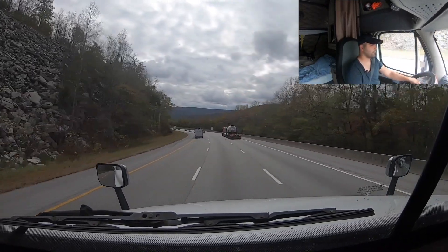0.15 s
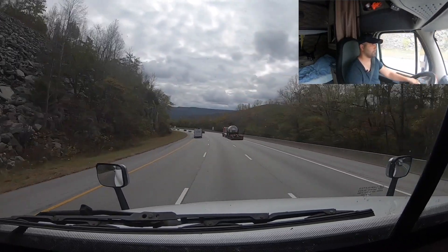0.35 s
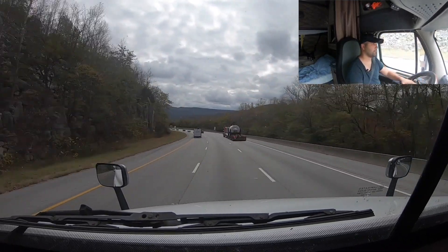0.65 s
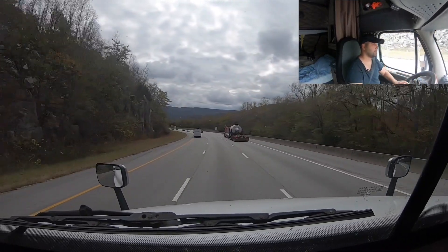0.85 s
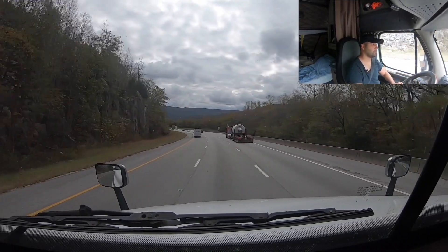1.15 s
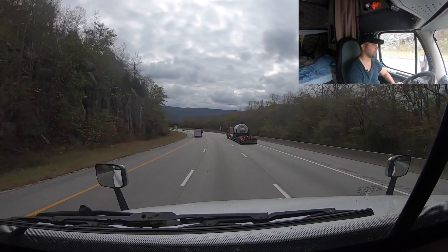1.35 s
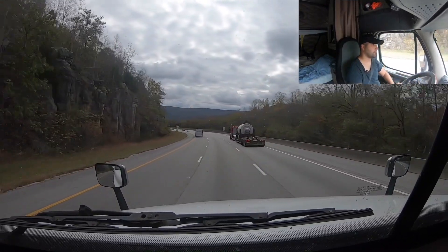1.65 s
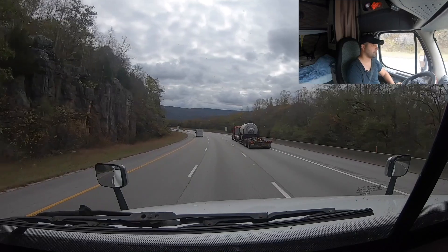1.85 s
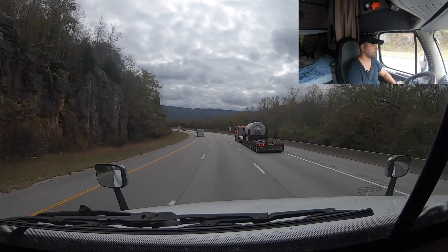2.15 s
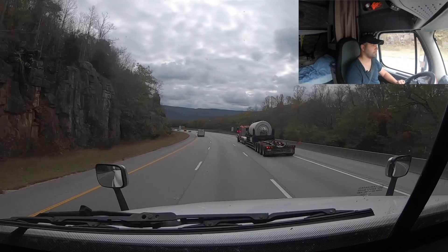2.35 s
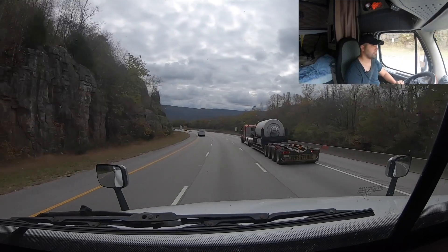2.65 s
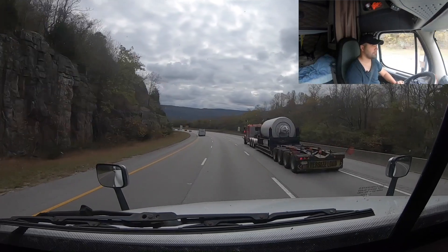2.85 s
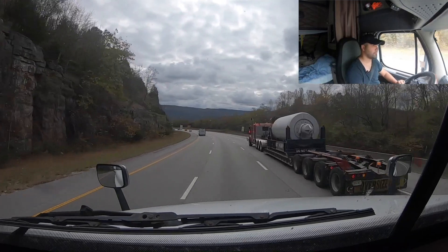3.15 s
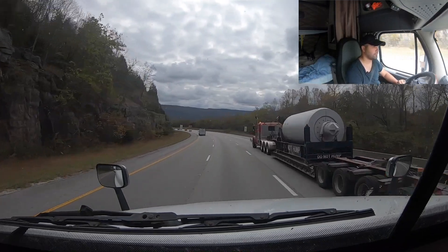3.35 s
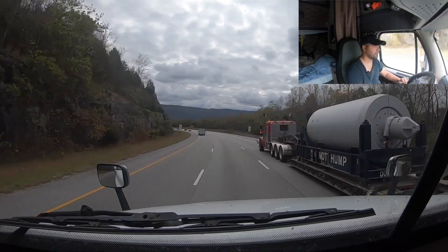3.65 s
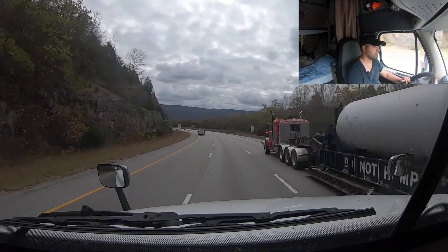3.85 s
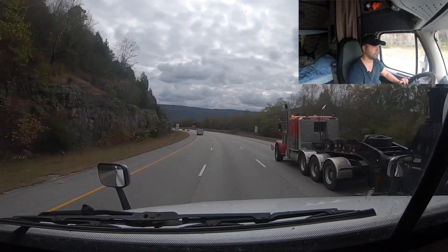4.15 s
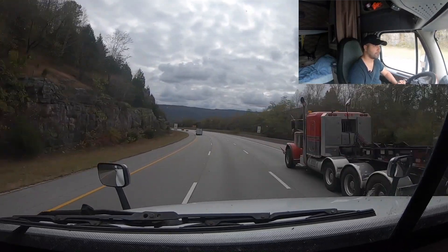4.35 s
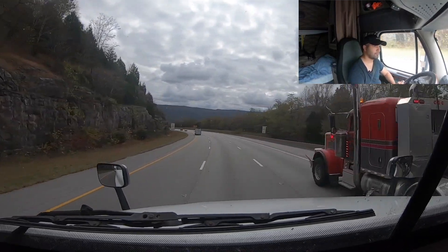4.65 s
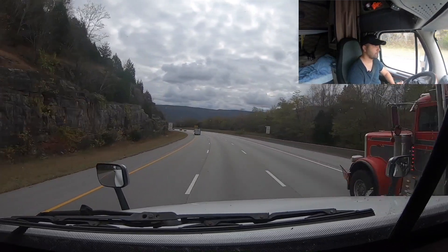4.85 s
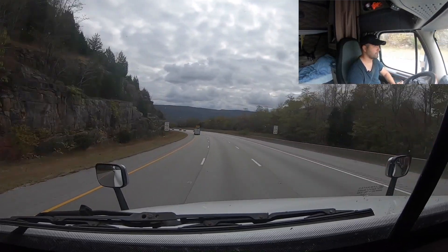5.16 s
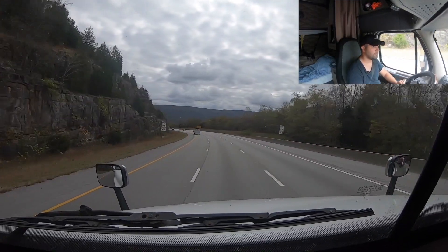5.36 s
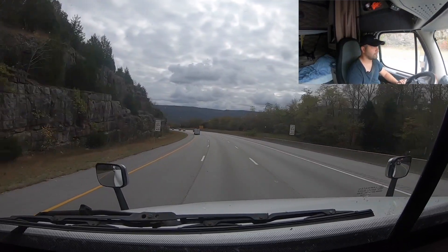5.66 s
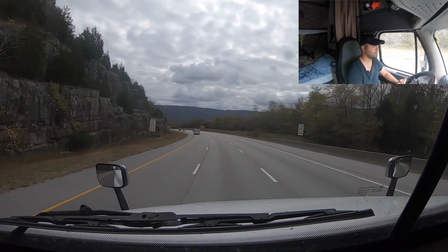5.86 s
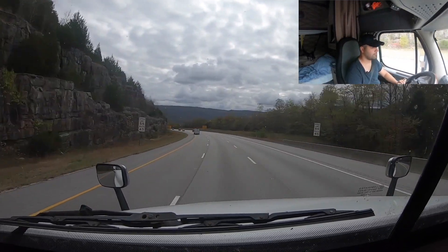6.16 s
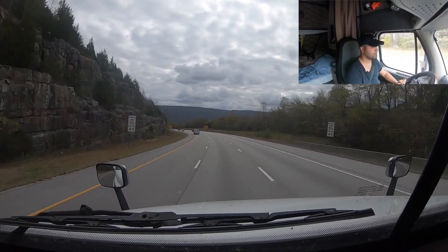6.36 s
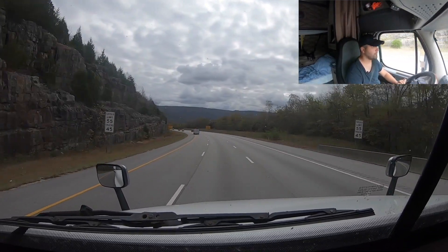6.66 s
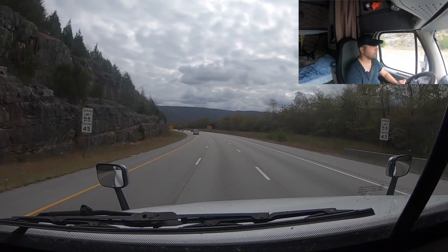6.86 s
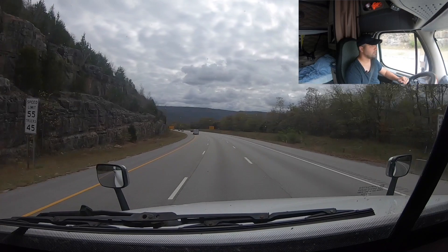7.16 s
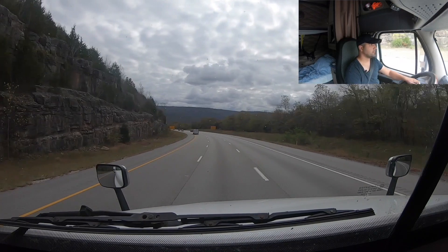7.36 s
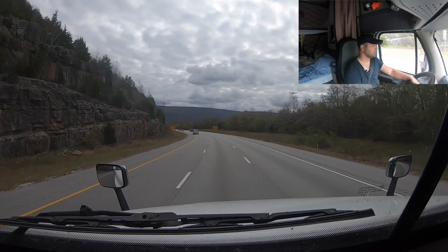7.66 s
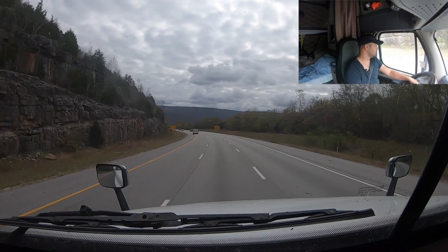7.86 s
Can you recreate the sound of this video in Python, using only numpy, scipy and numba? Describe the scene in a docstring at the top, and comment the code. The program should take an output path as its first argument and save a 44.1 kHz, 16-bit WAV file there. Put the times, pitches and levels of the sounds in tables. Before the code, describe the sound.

Inside the cab of a semi truck, heard from the dashboard, a diesel engine drones at a nearly constant pitch over a deep rumble of tyres and wind. From the start the engine brake adds valve clatter, hiss and a faint high turbo whistle, while loose trim buzzes and ticks lightly close by. The brake lets go at about 2 seconds and bites again at 3. From about 3.5 seconds a heavy hauler is overtaken: its tyres roar softly, then its exhaust throbs and growls against the truck's own engine, strongest around 5 seconds. At 5.5 seconds the brake comes off, the hiss and whistle die away, and a louder low exhaust boom fills the cab, easing near 7.7 seconds. A faint thin whine enters around 6.7 seconds. At the very end, near 8 seconds, a faint hiss rises as the brake starts to bite again.

```python
"""Inside the cab of a semi truck going down a grade, one microphone at the dashboard. From the start the
six-cylinder diesel drones near 1550 rpm under its engine brake, with valve clatter, hiss and a turbo
whistle; tyres and wind rumble and loose trim chatters close by. The brake lets go at 2.1 s and bites again
at 3 s. About five seconds in, a heavy hauler is overtaken. At 5.5 s the brake comes off and the exhaust
booms in the cab; a thin whine follows. At the very end a faint hiss rises as the brake starts to bite."""
import sys
import numpy as np
from scipy import signal
from scipy.fft import rfft, irfft, next_fast_len
from scipy.io import wavfile
from numba import njit

SR = 44100
rng = np.random.default_rng(int(sys.argv[2]) if len(sys.argv) > 2 else 0)


def generate_wav(signal):
    """Clip the signal to [-1, 1] and save it as 16-bit WAV at the path in sys.argv[1]."""
    frames = np.transpose(np.atleast_2d(signal))
    scaled = np.clip(frames, -1, 1) * 32767
    pcm = np.round(scaled).astype(np.int16)
    wavfile.write(sys.argv[1], SR, pcm)


N = 353241
CYLINDERS = 6
# engine speed (time [s], firing rate [Hz])
FIRING_RATE = [(0, 76.2), (1.5, 75.9), (3, 77), (5.35, 77), (6, 77.7), (6.5, 78.45), (7, 78.8), (8, 79.75)]


def undb(db):
    """Decibels to gain."""
    return 10 ** (np.asarray(db) / 20)


def level(x, db):
    """The sound at a given rms level."""
    return x * undb(db) / np.sqrt(np.mean(x ** 2))


def curve(table):
    """A table of (time, value), sample by sample."""
    times, values = np.transpose(table)
    return np.interp(np.arange(N) / SR, times, values)


def ramp(at_s, length_s):
    """A rise from 0 to 1 centred on a moment."""
    return np.clip(.5 + (np.arange(N) / SR - at_s) / length_s, 0, 1)


def passing(peak_s, half_s, db):
    """A gain that swells, peaks and fades, as when something slides past the microphone."""
    return undb(db) / (1 + ((np.arange(N) / SR - peak_s) / half_s) ** 2)


@njit
def lag(target, rise_s, fall_s):
    """Follow a target with inertia, at one pace up and another down."""
    out, now = np.empty(len(target)), target[0]
    for i in range(len(target)):
        now += (target[i] - now) / (SR * (rise_s if target[i] > now else fall_s))
        out[i] = now
    return out


def walk(rate):
    """A random wander with rate steps a second; rms 1."""
    steps = rng.standard_normal(4096)
    return level(np.interp(np.arange(N) / SR * rate, np.arange(len(steps)), steps), 0)


def turns(hz):
    """Cycles counted so far at a moving rate."""
    return np.cumsum(hz) / SR


def tone(cycles):
    """A sine of rms 1 that starts anywhere in its cycle."""
    return np.sqrt(2) * np.sin(2 * np.pi * (cycles + rng.random()))


def pulse(cycles):
    """A sine of rms 1 with its trough on each whole cycle."""
    return -np.sqrt(2) * np.cos(2 * np.pi * cycles)


def noise():
    """White noise of rms 1."""
    return rng.standard_normal(N)


def colour(x, points):
    """Filter by a spectrum of (frequency [Hz], level [dB]) points; rms 1."""
    size = next_fast_len(N)
    hz, db = np.transpose(points)
    bin_hz = np.maximum(np.arange(size // 2 + 1) * SR / size, 1)
    gain = undb(np.interp(np.log(bin_hz), np.log(hz), db))
    return level(irfft(rfft(x, size) * gain, size)[:N], 0)


def resonance(hz, width_hz):
    """Noise ringing in a steep resonance; rms 1."""
    b, a = signal.iirpeak(hz, hz / (1.5 * width_hz), fs=SR)
    return level(signal.lfilter(b, a, signal.lfilter(b, a, noise())), 0)


def cab(x, t60_s, wet):
    """Glass and panels near the microphone throw back early echoes, which comb the sound; rms 1."""
    t = np.arange(SR // 8) / SR
    echoes = rng.standard_normal(len(t)) * undb(-60 * t / t60_s)
    response = wet * echoes / np.linalg.norm(echoes)
    response[0] += 1
    return level(signal.fftconvolve(x, response)[:N], 0)


def drone(cycle, brake):
    """Engine and driveshaft lines; the low ones join in one thump a cycle; the brake shifts their mix."""
    # whole multiples come from the cylinders, the others from the driveshaft
    # (multiple of the cycle rate, level braking [dB], level rolling free [dB])
    lines = [(2, -32, -31), (2.83, -25.5, -29.5), (3, -39, -46), (4, -35, -32.5), (7, -42, -38),
             (8, -41, -45), (8.48, -34.5, -38.5), (9, -39, -30.5), (10, -35, -40), (13, -52, -52),
             (15, -55, -47), (17, -52, -52), (18, -42.5, -48.5), (19.77, -49, -54), (20, -52, -57),
             (22.6, -49, -51), (24, -54, -50), (26, -52, -50), (27, -49.5, -48), (28.25, -51, -51),
             (29, -52, -64), (30, -60, -50), (32, -52, -59), (34, -55, -57), (36, -55, -53), (38, -50, -53),
             (39, -55, -68), (40, -55, -61), (44, -58, -59), (45, -56, -60), (46, -57, -68), (54, -62, -57),
             (56, -56, -56), (57, -52.5, -53), (60, -57, -59), (63, -62, -57), (64, -57, -60),
             (66, -56, -58), (68, -58, -64), (69, -54, -55.5), (70, -54.5, -63), (71, -58, -68),
             (72, -54, -61), (75, -58, -70), (79, -62, -68), (84, -59, -70), (144, -68, -72),
             (165, -70, -85)]
    # stiff panels that sing when a line meets their pitch (frequency [Hz], width [Hz], lift [dB])
    stiff_panels = [(120, 4, 4.5), (359, 7, 7), (886, 9, 4.5)]
    tilt_db_per_octave = -0.02 - 0.04 * brake
    cycle_hz = curve(FIRING_RATE) / CYLINDERS
    out = 0
    for multiple, braking_db, free_db in lines:
        db = free_db + brake * (braking_db - free_db) + walk(4)
        singing_db = sum(lift_db / (1 + ((multiple * cycle_hz - hz) / (width / 2)) ** 2)
                         for hz, width, lift_db in stiff_panels)
        gain = undb(db + singing_db + tilt_db_per_octave * np.log2(multiple))
        stray = (rng.random() - .5) * min(multiple / 16, 1)  # higher lines fall out of step
        out = out + gain * pulse(multiple * cycle + stray)
    return out


def exhaust_boom(cycle, crank_wobble=.03):
    """The firing pulses, smoothed by the muffler to two harmonics, swell in the cab."""
    # boom at the firing rate (time [s], level [dB])
    firing_levels = [(0, -36), (.6, -28), (1.1, -53), (2.2, -37), (2.6, -28.5), (3.15, -31.5), (3.9, -26.5),
                     (4.9, -23.5), (5.38, -29.5), (5.53, -13), (5.68, -18.5), (6.3, -14), (7, -19),
                     (7.12, -24), (7.27, -17.5), (7.58, -19.5), (7.78, -26.5), (8.01, -31)]
    # its second harmonic (time [s], level [dB])
    overtone_levels = [(0, -51), (1, -40.5), (2, -33), (2.7, -36.5), (3.1, -34), (3.6, -40), (4.1, -37),
                       (6.2, -38), (6.5, -30.5), (7.2, -35), (7.5, -48)]
    beats = CYLINDERS * cycle + crank_wobble * np.sin(2 * np.pi * cycle)  # the crank hurries and lags
    firing = undb(curve(firing_levels) + 0.37 * walk(6.8)) * pulse(beats)
    overtone = undb(curve(overtone_levels) + walk(3.12)) * pulse(2 * beats)
    return firing + overtone


def engine_brake(cycle, brake, clatter_db=-48, hiss_db=-45.5, puff_depth=0.32, idle_share=0.66):
    """Each cylinder dumps its compressed air: a knock that repeats every cycle, and a puff of hiss."""
    # valve clatter heard through the firewall (frequency [Hz], level [dB])
    clatter_spectrum = [(100, -24), (400, 3), (650, -7), (800, 6), (1060, -1.5), (1300, -2), (2200, -15.5),
                        (4000, -19), (8000, -33)]
    # the brake's hiss heard in the cab (frequency [Hz], level [dB])
    hiss_spectrum = [(300, 1), (600, -15), (880, 8), (1300, -8), (1900, -8.5), (3400, -19), (4500, -47),
                     (5500, -23.5), (6500, -16), (7600, -22), (11000, -22.5), (13600, -30), (14300, -26),
                     (14850, -17), (15400, -27)]
    puff = 1 - puff_depth + puff_depth * np.exp(-(CYLINDERS * cycle % 1) / 0.4)
    pattern = rng.standard_normal(4096)  # every cylinder and valve knocks in its own way
    knocks = np.interp(cycle % 1, np.linspace(0, 1, len(pattern)), pattern) * puff
    valve_force = idle_share + (1 - idle_share) * brake  # the valves tick on without the brake
    clatter = colour(knocks, clatter_spectrum) * valve_force
    air = cab(noise() * puff, t60_s=0.086, wet=1.0)
    hiss = colour(air + 0.25 * knocks, hiss_spectrum)
    pressure = lag(brake, rise_s=0.017, fall_s=.14)  # the air bleeds away after the brake lets go
    return undb(clatter_db) * clatter + pressure * undb(hiss_db) * hiss


def gears(cycle, brake, teeth=83, whine_db=-49.5):
    """The timing gears whine as the brake's load builds; a second whine flares briefly just below."""
    load = lag(brake, rise_s=0.66, fall_s=.02)
    whine = load * undb(whine_db + .7 * walk(2.56)) * tone(teeth * cycle)
    flare = passing(peak_s=4.07, half_s=0.13, db=-47.5) * tone(79.3 * cycle)
    return brake * (whine + flare)


def turbo(brake, free_hz=8130, braking_hz=10235, slow_db=-73.5, full_db=-67, flutter=0.00198):
    """Compressor blades whistle in turbulent air, spinning up under the brake, running down after it."""
    spin = lag(brake, rise_s=1.0, fall_s=.29)
    hz = free_hz + spin * (braking_hz - free_hz)
    blades = tone(turns(hz * (1 + flutter * walk(70))))
    db = slow_db + brake * np.sqrt(spin) * (full_db - slow_db) + walk(16)
    whistle = level(blades * (1 + walk(260)), 0)
    fade = np.minimum(spin / .05, 1)  # the whistle dies as the boost runs out
    return fade * undb(db) * whistle


def panel_hum(cycle, multiple=22):
    """A cab panel hums along with one multiple of the engine's cycle rate."""
    # the panel's hum (time [s], level [dB])
    hum_levels = [(0, -33), (.9, -32.5), (1.7, -34), (2.0, -40), (2.3, -44), (2.5, -36.5), (2.9, -39),
                  (3.4, -32), (3.75, -35), (4.1, -32), (4.7, -33), (5.05, -38), (5.35, -36), (5.8, -46),
                  (6.2, -40), (8.01, -39)]
    return undb(curve(hum_levels) + walk(7.1)) * tone(multiple * cycle)


def road(rush_db=-27, rumble_top_hz=62.5):
    """Tyres and wind through the shell of the cab, its hollows ringing; the rumble follows the bumps."""
    # gusts of wind on the cab (time [s], gain [dB])
    wind = [(0, -1), (2.5, -1.5), (3.6, -2), (4.9, -0.5), (5.7, 0), (6.4, -0.5), (7.2, 0.5), (8.01, -1)]
    # rush of wind and road heard inside (frequency [Hz], level [dB])
    rush_spectrum = [(8, -14), (50, -6.5), (70, -5.5), (130, -8), (220, -19.5), (430, -25.5), (640, -25.5),
                     (820, -26), (1100, -33.5), (2000, -44), (3500, -50.5), (4400, -59.5), (6000, -54.5),
                     (11000, -64), (15500, -66)]
    # roar of the tyres on the changing surface (time [s], level [dB])
    surface = [(0, -38.5), (1, -44), (1.8, -43), (2.3, -37), (3, -41), (3.6, -37), (5.4, -41.5), (5.9, -39),
               (7.2, -42), (8.01, -38)]
    # colour of that roar (frequency [Hz], level [dB])
    roar_spectrum = [(100, -27), (200, 1), (330, 4), (480, -5), (600, -1), (760, -21), (950, -14),
                     (1300, -12), (2000, -35), (4000, -45), (8000, -62)]
    # hollows of the cab that the road excites (frequency [Hz], width [Hz], level [dB])
    cab_modes = [(14.05, 8.9, -23.5), (25.5, 4.8, -34.5), (40, 9, -34), (49, 11.6, -36.5),
                 (279.2, 25, -44.5), (338, 30, -45.5), (420.3, 13.4, -51.5), (495.5, 40, -50.5),
                 (742, 27, -51.5)]
    # deep rumble over the uneven road (time [s], gain [dB])
    bumps = [(0, 5), (1.55, -5), (1.8, -19), (2.05, 6), (2.7, -11.5), (3.2, -3), (3.5, 2), (4.2, 2),
             (4.65, 0), (5.15, 1.5), (5.7, 0), (6.25, -8), (7, 0.5), (7.7, 3.5), (8.01, 2)]
    rush = undb(rush_db + curve(wind) + 0.5 * walk(4)) * colour(noise(), rush_spectrum)
    roar = undb(curve(surface)) * colour(noise(), roar_spectrum)
    hollows = sum(undb(db) * resonance(hz, width) for hz, width, db in cab_modes)
    inside = rush + roar + hollows
    deep = signal.sosfiltfilt(signal.butter(3, rumble_top_hz, fs=SR, output="sos"), inside)
    return inside + deep * (undb(curve(bumps)) - 1)


def loose_trim(cycle, brake, chatter_db=-61, scatter_db=3.2, settle_cycles=0.78, tick_s=0.0094):
    """Trim buzzes, jolted about once an engine cycle and harder under the brake; bumps make it tick."""
    # its clearest ticks (time [s], level [dB])
    ticks = [(.355, -54), (.972, -54), (1.835, -53), (2.081, -51), (2.125, -54), (2.254, -51), (2.829, -56),
             (2.989, -50), (3.438, -56), (4.109, -52), (4.365, -54), (4.42, -55), (4.825, -54), (4.89, -51),
             (5.436, -52), (6.203, -58), (6.455, -59), (6.51, -56), (6.606, -56), (6.709, -58),
             (6.834, -56)]
    # colour of its chatter (frequency [Hz], level [dB])
    chatter_spectrum = [(2500, -24), (4500, -2), (6000, 1), (7400, -3), (8600, 0.5), (10000, 0),
                        (12200, 0.5), (13300, -6), (14400, -3.5), (16000, -16)]
    t = np.arange(N) / SR
    since_jolt = (cycle + 0.031 * walk(15)) % 1
    jolts = 1 + 0.44 * np.exp(-since_jolt / settle_cycles)
    shake_db = 0.5 * brake + scatter_db * np.minimum(walk(48), 1.6)
    force = level(undb(shake_db) * jolts, chatter_db)
    for at_s, db in ticks:
        age = np.maximum(t - at_s, 0)
        force = force + undb(db - 1) * (t > at_s) * np.exp(-age / tick_s)
    grainy_buzz = noise() * undb(1.5 * walk(480))
    return force * colour(cab(grainy_buzz, t60_s=0.064, wet=0.38), chatter_spectrum)


def hauler_tyres():
    """The hauler draws alongside: the trailer's many tyres roar first, then the tractor's, lower."""
    # its wheels going by (time nearest [s], half length [s], level [dB], centre [Hz], width [Hz])
    wheels = [(3.5, 0.91, -45, 767, 130), (4.9, 1, -40, 324, 110)]
    return sum(passing(at_s, half_s, db) * resonance(hz, width) for at_s, half_s, db, hz, width in wheels)


def hauler(cycle, in_step_s=4.5, tyre_hz=133):
    """The hauler's exhaust beats against the truck's own and sinks as it slides by; its tyres drone."""
    # its firing rate as heard from the cab (time [s], rate [Hz])
    heard_rate = [(0, 80), (3.6, 80.3), (4.2, 80.35), (4.5, 81.4), (4.85, 81.5), (5.1, 80.7), (5.35, 79.6),
                  (5.55, 78), (5.9, 77.6), (8, 77)]
    # swells of its exhaust note, an octave over the throb (time [s], half length [s], level [dB])
    swells = [(4.144, 0.045, -33), (4.69, 0.035, -28.5), (4.907, 0.09, -21.5), (5.32, 0.051, -35),
              (5.563, 0.16, -22)]
    # lines from its uneven cylinders (multiple of its cycle rate, relative level [dB])
    growl_lines = [(11, -5), (13, 2), (14, 1), (15, -5), (17, -13), (18, -11)]
    firing = turns(curve(heard_rate))
    lead = firing - CYLINDERS * cycle
    firing = firing - np.interp(in_step_s, np.arange(N) / SR, lead)  # both engines fire together here
    throb = passing(peak_s=4.75, half_s=0.74, db=-23.5) * pulse(firing)
    note = sum(passing(*swell) for swell in swells) * tone(2 * firing)
    growl = sum(undb(db) * tone(multiple * firing / CYLINDERS) for multiple, db in growl_lines)
    rumble = undb(-5) * resonance(hz=172, width_hz=37)
    body = passing(peak_s=5.17, half_s=0.37, db=-30.5) * (growl + rumble)
    tyre_drone = tone(turns(tyre_hz * (1 + 0.0075 * walk(20))))
    tyres = passing(peak_s=5.27, half_s=0.098, db=-18.5) * tyre_drone
    return throb + note + body + tyres


def coasting_whine(db=-73):
    """A thin whine comes up late, while the truck rolls free."""
    return ramp(at_s=6.7, length_s=0.46) * undb(db) * resonance(hz=6180, width_hz=70)


def brake_onset_hiss(db=-53.5, grain_db=3):
    """A faint hiss rises at the very end as the engine brake starts to bite again."""
    gain = ramp(at_s=7.93, length_s=.12) * undb(db + grain_db * walk(90))
    return gain * resonance(hz=3200, width_hz=1600)


def scene(brake_ramp_s=.14):
    """Everything as it reaches the dashboard, in mono."""
    # spells of the engine brake; two fall within the scene (time on [s], time off [s])
    brake_spells = [(-1, 2.11), (3, 5.51), (10, 9)]
    brake = sum(ramp(on, brake_ramp_s) - ramp(off, brake_ramp_s) for on, off in brake_spells)
    firing_hz = curve(FIRING_RATE) * (1 + .0004 * walk(14))
    cycle = turns(firing_hz) / CYLINDERS  # four-stroke cycles so far
    engine = drone(cycle, brake) + exhaust_boom(cycle) + engine_brake(cycle, brake)
    whines = gears(cycle, brake) + turbo(brake) + coasting_whine()
    hum = panel_hum(cycle)
    from_outside = road() + hauler(cycle) + hauler_tyres()
    return (engine + whines + hum + from_outside + loose_trim(cycle, brake) + brake_onset_hiss())[None]


def record(dry, low_cut_hz=10, top_hz=15700, fade_s=.002):
    """The microphone loses the deepest rumble and the very top; the sound fades in and out quickly."""
    low_cut = signal.butter(2, low_cut_hz, "high", fs=SR, output="sos")
    high_cut = signal.ellip(12, .1, 80, top_hz, fs=SR, output="sos")
    fades = signal.windows.tukey(N, 2 * fade_s * SR / N)
    return signal.sosfilt(high_cut, signal.sosfilt(low_cut, dry) * fades)


dry = scene()
out = record(dry)
generate_wav(out)
```